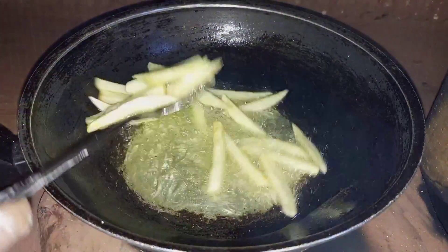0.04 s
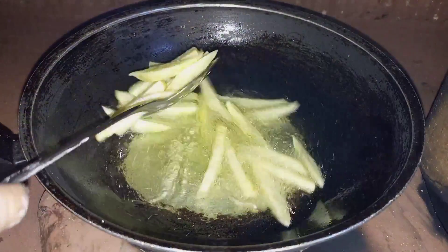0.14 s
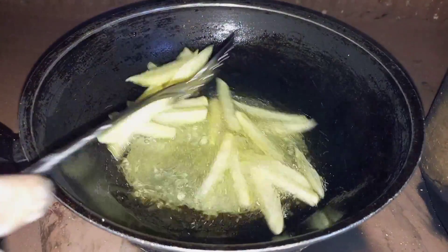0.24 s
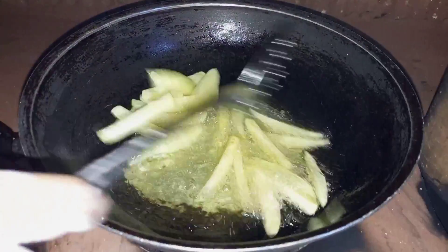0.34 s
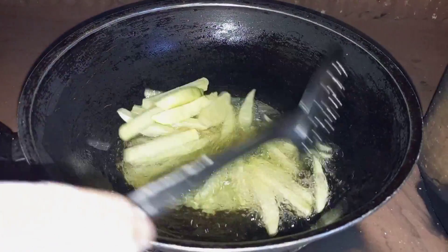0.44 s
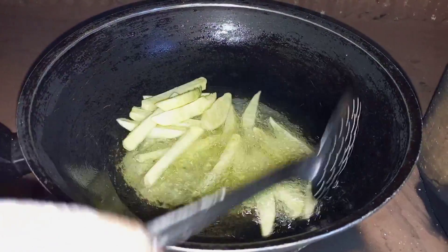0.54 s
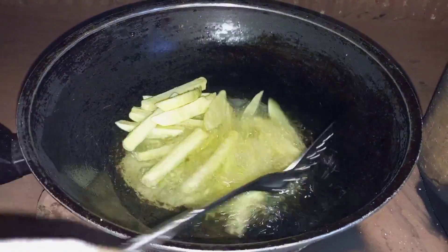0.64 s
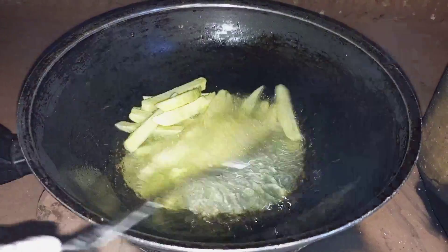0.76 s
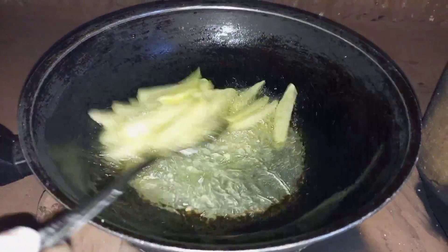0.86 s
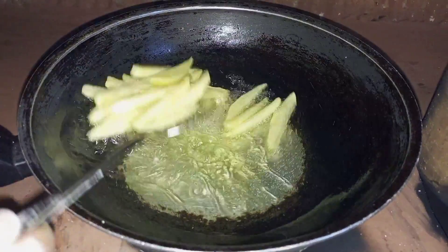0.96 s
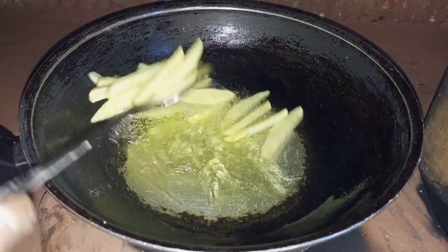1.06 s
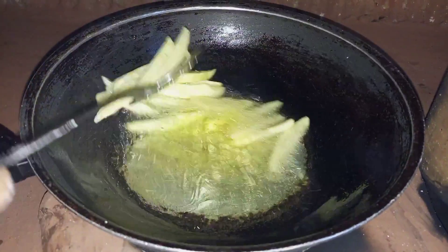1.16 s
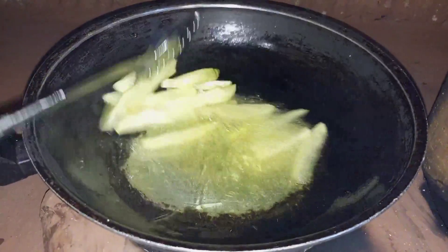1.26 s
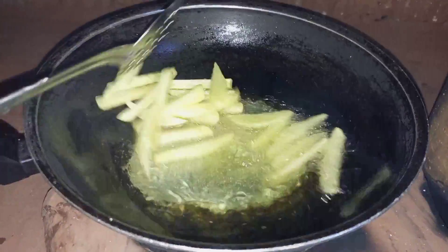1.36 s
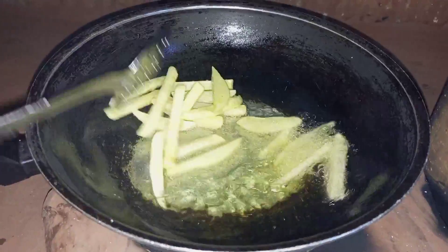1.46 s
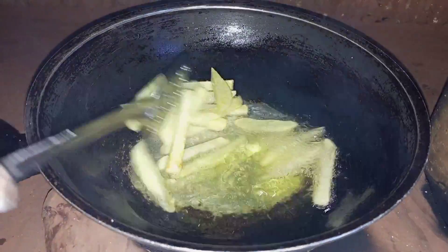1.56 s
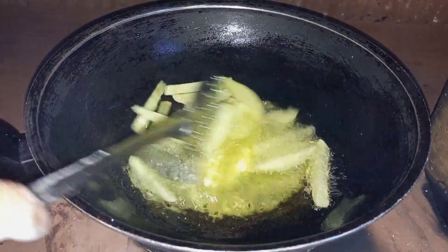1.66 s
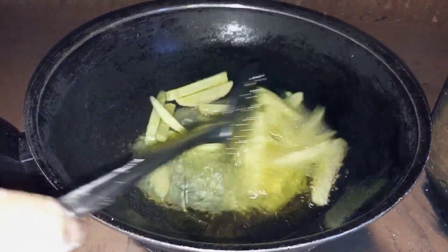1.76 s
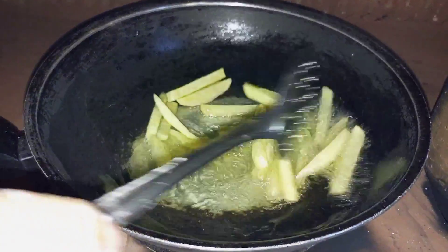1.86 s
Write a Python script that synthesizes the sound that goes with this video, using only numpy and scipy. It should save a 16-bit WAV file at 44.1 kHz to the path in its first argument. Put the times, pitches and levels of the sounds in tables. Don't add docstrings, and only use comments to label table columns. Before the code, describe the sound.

Potato strips sizzle in hot oil while a metal skimmer knocks and scrapes the wok

```python
import sys
import numpy as np
from scipy import signal
from scipy.fft import rfft, irfft
from scipy.io import wavfile
from scipy.ndimage import uniform_filter1d

SR = 44100
rng = np.random.default_rng(int(sys.argv[2]) if len(sys.argv) > 2 else 0)


def int16_out(signal):
    q = np.round(np.clip(np.atleast_2d(signal).T, -1, 1) * 32767)
    wavfile.write(sys.argv[1], SR, q.astype(np.int16))


def makeup_ratio(level_db):
    decades = np.asarray(level_db, float) / 20
    return 10 ** decades


N = 85995

# (time [s], strength [dB], centre of answering modes [Hz], spread [octaves])
KNOCKS = [(.138, -30, 1696, 0.05), (.222, -34.5, 2530, 0.043), (.222, -44, 3580, 0.056),
          (.232, -48, 2460, 0.054), (.412, -41, 1470, 0.16), (.445, -53, 520, 0.39), (.718, -35, 4440, 1.9),
          (.7185, -31, 580, 0.33), (.7183, -33, 1010, 0.29), (.7187, -33, 2470, 0.054),
          (.724, -35, 1860, 0.22), (.772, -34.5, 1120, 0.37), (.775, -41, 1950, 0.2), (.825, -49, 6000, .5),
          (.836, -43, 6040, 0.07), (.839, -32, 1290, 0.11), (.8395, -35, 2394, 0.045),
          (.8725, -34, 1330, 0.17), (.873, -37, 1970, 0.11), (.8735, -44, 367, .2),
          (.8728, -33.5, 2700, 0.053), (.888, -40.5, 1910, 0.15), (.945, -33, 2460, 0.076),
          (.9452, -31, 2120, 0.11), (0.9458, -46.5, 1790, 1.08), (.96, -46, 2010, .1),
          (.9455, -31.5, 1130, 0.25), (.9458, -45.5, 3150, .08), (.952, -44, 805, 0.14),
          (.984, -34.5, 593, 0.1), (1.006, -44, 630, .12), (1.022, -41, 2140, .05),
          (1.05, -38.5, 576, 0.037), (1.088, -39.5, 602, 0.032), (1.1027, -38.5, 8630, 0.13),
          (1.1697, -55, 6100, 0.23), (1.187, -45, 2140, 0.054), (1.268, -61, 3460, .05),
          (1.277, -40, 2800, 0.041), (1.4274, -42.5, 690, 0.72), (1.4275, -53.5, 6140, 0.39),
          (1.483, -54, 710, 0.82), (1.526, -39.5, 1750, 0.054), (1.76, -52, 664, 0.12),
          (1.89, -62, 547, 0.13)]


def evened(x):
    return x / np.sqrt(np.mean(x ** 2) + 1e-20)


def read(points, hz):
    f, value = np.transpose(points)
    return np.interp(np.log(hz + 1), np.log(f + 1), value, right=-90)


def add(mix, s, sound):
    part = mix[round(s * SR):][:len(sound)]
    part += sound[:len(part)]


def near(hz, centre_hz, spread_oct):
    return np.exp(-.5 * (np.log2(hz / centre_hz) / spread_oct) ** 2)


def colour(x, shape, patch_db):
    hz, _, z = signal.stft(x, SR, nperseg=512, noverlap=384)
    patches = uniform_filter1d(rng.standard_normal(z.shape), size=5, axis=0)
    patches = evened(uniform_filter1d(patches, size=14, axis=1))
    z = z * shape(hz)[:, None] * makeup_ratio(patch_db * np.minimum(patches, 1.3))
    return evened(signal.istft(z, SR, nperseg=512, noverlap=384)[1][:N])


def clicks(per_s, spread_db, count):
    draw = rng.random((count, 3))
    happens = draw[:, 0] < per_s / SR
    sign = np.sign(draw[:, 1] - .5)
    return happens * sign * makeup_ratio(-spread_db * np.log(draw[:, 2] + .01))


def bubbles():
    # (time [s], level [dB])
    boil = [(0, -52.5), (0.119, -50), (.25, -48.5), (.5, -47), (.62, -49), (.82, -47), (1.02, -50),
            (1.11, -48), (1.36, -47), (1.42, -47.5), (1.66, -46), (1.76, -51), (1.95, -50)]
    # (frequency [Hz], level [dB per Hz])
    fizz_colour = [(4300, -22.5), (6400, -1.5), (7700, -5), (9200, -0.5), (10400, -8.5), (11500, -21),
                   (14000, -22), (14900, -10)]
    pops_per_s, pop_spread_db, pop_share = 5000, 2.5, .45
    offset_db, patch_db = 1, 1.5
    finest_hz, finer_db_per_s, finest_flicker_db = 13000, 2, 1.5

    t, u = np.arange(N) / SR, np.arange(60) / SR
    pops = np.zeros(N)
    for hz in np.geomspace(4500, 15500, num=16):
        grain = np.sin(2 * np.pi * hz * u) * np.exp(-u * hz / 1.16)
        grain = grain / np.linalg.norm(grain) * np.sqrt(hz)
        pops += signal.oaconvolve(clicks(pops_per_s / 16, pop_spread_db, count=N), grain)[:N]
    source = np.sqrt(pop_share) * evened(pops) + np.sqrt(1 - pop_share) * rng.standard_normal(N)

    points = list(fizz_colour) + [(SR / 2, fizz_colour[-1][1])]
    fizz = colour(source, lambda hz: makeup_ratio(read(points, hz)) * np.clip(hz / 4200, 0, 1) ** 6, patch_db)

    flicker = uniform_filter1d(uniform_filter1d(rng.standard_normal(N), size=900), size=900)
    finest_db = finer_db_per_s * (t - 2.0) + finest_flicker_db * evened(flicker)
    high = signal.butter(6, finest_hz, "high", fs=SR, output="sos")
    fizz = fizz + signal.sosfiltfilt(high, fizz) * (makeup_ratio(finest_db) - 1)
    return fizz * makeup_ratio(np.interp(t, *np.transpose(boil)) + offset_db)


def simmer():
    # (frequency [Hz], level [dB per Hz])
    simmer_colour = [(18, -48), (30, -25), (118, -11), (436, -15.5), (588, -12), (1000, -13), (1700, -6),
                     (3190, -8.5), (4400, -10), (5000, -12), (6500, -3.5), (11000, -120)]
    # (time [s], level [dB])
    simmer_level = [(0, -61), (.2, -64.5), (.38, -59.5), (.45, -59), (.6, -61.5), (.7, -58.5), (.95, -53),
                    (1.03, -62), (1.15, -59.5), (1.25, -58), (1.5, -58), (1.6, -62), (1.7, -59),
                    (1.95, -60.5)]
    bloops = rng.standard_normal(N) + .5 * evened(clicks(900, 4.4, count=N))
    rumble = colour(bloops, lambda hz: makeup_ratio(read(simmer_colour, hz)), patch_db=2.2)
    return rumble * makeup_ratio(np.interp(np.arange(N) / SR, *np.transpose(simmer_level)))


def contacts():
    # (start [s], length [s], pressure [dB], start centre [Hz], end centre [Hz])
    drags = [(-.03, 0.15, -67.5, 577, 763), (.001, 0.19, -79, 1110, 1030), (.025, 0.063, -70.5, 2270, 1950),
             (0.271, 0.083, -71, 1960, 2052), (0.409, 0.15, -74, 543, 410), (.411, 0.22, -82.5, 1440, 1512),
             (.745, 0.11, -58.5, 359, 356), (.75, .09, -63.5, 550, 570), (.76, 0.062, -62.5, 760, 840),
             (0.6, 0.23, -80.5, 5950, 3800), (.86, 0.17, -70, 366, 420), (.87, 0.1703, -64, 638, 634),
             (1.427, 0.083, -72, 700, 864), (1.53, 0.14, -70.5, 6100, 6300), (.72, .045, -78, 2870, 2800),
             (.83, 0.056, -70, 3500, 3440), (.87, 0.089, -72, 5760, 5760), (1.68, 0.13, -82, 735, 526),
             (1.72, 0.16, -77.5, 1324, 1650)]
    # (start [s], length [s], pressure [dB], start centre [Hz], end centre [Hz])
    scoops = [(.125, 0.1295, -73.5, 1566, 2740), (.5, 0.066, -86, 403, 296),
              (1.18, 0.12, -77.5, 1940, 2600), (1.26, 0.068, -74.5, 2900, 3320),
              (1.35, 0.026, -78, 7060, 7700)]
    # (start [s], length [s], pressure [dB], centre [Hz])
    rubs = [(.47, 0.042, -59.5, 1850), (.575, 0.099, -64.5, 3130), (.568, 0.039, -61.5, 2300),
            (1.1, 0.036, -72, 2790), (1.1, 0.036, -58, 2665), (1.025, .05, -67, 2110),
            (1, 0.082, -70, 2400), (1.1, 0.062, -68, 1490), (.875, 0.15, -59, 890), (0.84, 0.064, -81, 552),
            (.79, 0.11, -67.5, 5040), (.771, 0.13, -60, 1250), (1.2, 0.054, -69.5, 580),
            (1.16, .05, -72, 611), (1.8, 0.1, -82, 2420), (1.1, 0.078, -71.5, 335), (1.3, 0.066, -69, 1233),
            (2.5, 0.071, -56, 410), (1.7, 0.073, -70, 800), (1.64, 0.048, -70, 5080),
            (.255, 0.12, -74.5, 2530), (0.27, 0.078, -69, 3975), (.47, 0.08, -73.5, 3150)]
    # (start [s], length [s], pressure [dB], start centre [Hz], end centre [Hz])
    clatter = [
        (.41, 0.36, -82.5, 2040, 2350),
        (.715, 0.054, -64.5, 5200, 4570),
        (.73, 0.288, -69.5, 1800, 1380),
    ]
    rise_s, slips_per_s, slip_spread_db = 0.011, 1500, 2.6

    # strokes, spread [octaves], swell over the stroke [dB], direct rasp [dB]
    ways = [(drags, 0.17, -10.5, 4), (scoops, 0.23, 2.7, 19.8),
            (rubs, 0.038, -12, 1), (clatter, 0.71, -10, 21.5)]
    for strokes, spread_oct, swell_db, rasp_db in ways:
        for start, length, db, *ends in strokes:
            from_hz, to_hz = ends[0], ends[-1]
            t = np.arange(0, length, 1 / SR)
            slips = evened(clicks(slips_per_s, slip_spread_db, count=SR // 2))[:len(t)]
            press = np.clip(np.minimum(t, length - t) / rise_s, 0, 1)
            press = press * makeup_ratio(db + swell_db * t / length)
            centre_hz = from_hz * (to_hz / from_hz) ** (t / length)
            heard = t + start >= 0
            yield max(start, 0), (slips * press)[heard], centre_hz[heard], spread_oct, rasp_db


def metal(strokes):
    # (frequency [Hz], level [dB])
    wok = [(341, -8.5), (400, -10.5), (495, -12.5), (560, -5.5), (590, -6.5), (669, -8), (780, -5),
           (833, -7.5), (981, -9), (1124, -8), (1190, -7), (1257, -12), (1380, -12.5), (1480, -18)]
    # (frequency [Hz], level [dB])
    rim = [(1760, -18.5), (1840, -10.5), (1933, -9), (2121, -10.5), (2400, -12), (2510, -7.5), (2665, -15),
           (2810, -13.5), (3150, -9), (3230, -12.5), (3440, -11), (3750, -8.5), (3975, -9), (4570, -3)]
    skimmer_hz = [4832, 5100, 5185, 5500, 5800, 6230, 6475, 6570, 6690, 6978, 7352, 7398, 8930, 10930]
    # (level [dB], t60 [s])
    skimmer = [(-7, 0.072), (-0.5, 0.051), (-1, 0.058), (0.5, 0.023), (1, 0.048), (3, 0.078), (1, .05),
               (2, 0.067), (-16, .09), (-3.5, 0.067), (7.5, 0.069), (1, 0.033), (-2.5, 0.051), (-2, 0.089)]
    wok_t60_s, rim_t60_s, longest_t60_s = 0.12, 0.076, .14
    mode_scatter_db, lag_s = 2.5, .0004

    modes = [(*m, wok_t60_s) for m in wok] + [(*m, rim_t60_s) for m in rim]
    modes += [(hz, *m) for hz, m in zip(skimmer_hz, skimmer)]
    scatter = rng.standard_normal((len(KNOCKS), len(modes), 2))
    out = np.zeros(N)
    for k, (hz, db, t60_s) in enumerate(modes):
        drive = np.zeros(N)
        for (s, hit_db, centre_hz, spread_oct), (size, lag) in zip(KNOCKS, scatter[:, k]):
            hit = makeup_ratio(hit_db + mode_scatter_db * size) * near(hz, centre_hz, spread_oct)
            drive[round((s + lag_s * abs(lag)) * SR)] += hit
        for s, slips, centre_hz, spread_oct, _ in strokes:
            add(drive, s, (-1) ** k * slips * near(hz, centre_hz, spread_oct))
        r = np.exp(-np.log(1000) / (min(t60_s, longest_t60_s) * SR))
        w = 2 * np.pi * hz / SR
        out += makeup_ratio(db) * signal.lfilter([0, r * np.sin(w)], [1, -2 * r * np.cos(w), r * r], drive)
    return out


def rasp(strokes):
    out = np.zeros(N)
    for s, slips, centre_hz, spread_oct, rasp_db in strokes:
        turn = np.exp(2j * np.pi * np.cumsum(centre_hz) / SR)
        r = np.exp(-2 * np.pi * spread_oct * centre_hz.mean() / SR)
        smooth = signal.lfilter([(1 - r) ** 4], np.poly([r, r, r, r]), slips / turn)
        add(out, s, makeup_ratio(rasp_db) * 2 * (turn * smooth).real / np.sqrt(1 - r))
    return out


def kitchen(x):
    t60_s = 0.085
    taps = np.zeros(SR // 2)
    at = np.arange(200, len(taps) - 20, 20)
    taps[at + rng.integers(0, 20, len(at))] = rng.choice([-1., 1.], len(at))
    taps *= makeup_ratio(-60 * np.arange(len(taps)) / SR / t60_s)
    return signal.fftconvolve(x, taps / np.linalg.norm(taps))[:N]


def thumps():
    # (time [s], peak [dB], pitch [Hz])
    pushes = [(.04, -63, 162), (.085, -68, 139), (0.273, -67.5, 193), (0.294, -64, 316),
              (0.421, -61.5, 272), (0.522, -90, 110), (0.722, -63, 150), (.81, -60.5, 132),
              (.965, -56.5, 134), (1.31, -72, 223), (1.499, -65, 154), (1.696, -61, 116), (1.733, -63, 120),
              (1.849, -87, 159)]
    length_s = 0.025
    out, t = np.zeros(N), np.arange(0, length_s, 1 / SR)
    for s, db, hz in pushes:
        add(out, s, makeup_ratio(db) * np.sin(np.pi * t / length_s) ** 2 * np.sin(2 * np.pi * hz * t))
    return out


def cracks():
    crack_db, t60_s, rise_s = -4.5, .07, 0.00073
    out, t = np.zeros(N), np.arange(4096) / SR
    hz = np.fft.rfftfreq(len(t), 1 / SR) + 1
    body = np.clip(hz / 300, 0, 1) ** 3 / (1 + (hz / 8000) ** 6) / np.sqrt(hz)
    for s, db, centre_hz, spread_oct in KNOCKS:
        tone = near(hz, centre_hz, spread_oct) * body
        burst = evened(irfft(rfft(rng.standard_normal(len(t))) * tone))
        decay = np.minimum(t / rise_s, 1) * makeup_ratio(db + crack_db - 60 * t / t60_s)
        add(out, s, burst * decay * min(spread_oct, 1))
    return out


def scene():
    radiates_above_hz, room_db = 291, -11
    strokes = list(contacts())
    steel = metal(strokes) + rasp(strokes) + cracks()
    no_bass = signal.cheby2(6, 40, 0.73 * radiates_above_hz, "high", fs=SR, output="sos")
    steel = signal.sosfilt(no_bass, steel)
    steel = signal.sosfilt(signal.butter(4, 12000, fs=SR, output="sos"), steel)
    mix = bubbles() + simmer() + steel + makeup_ratio(room_db) * kitchen(steel) + thumps()
    return np.array([mix, mix])


def roll_off(x):
    return signal.sosfilt(signal.butter(12, 16780, fs=SR, output="sos"), x)


def record(dry):
    edge = signal.firwin(1023, 15600, window=("kaiser", 10), fs=SR)
    mix = signal.oaconvolve(dry, edge[None], "same")
    return roll_off(mix)


dry = scene()
out = record(dry)
int16_out(out)
```